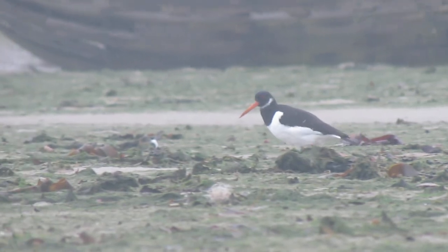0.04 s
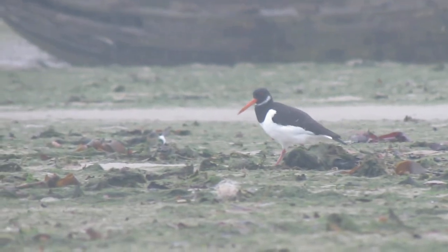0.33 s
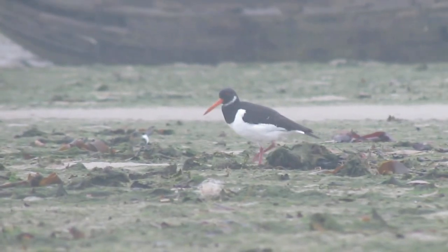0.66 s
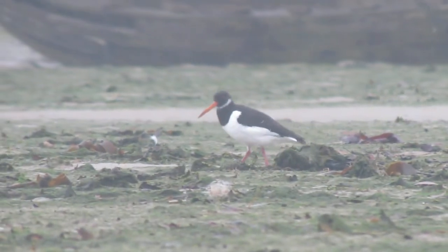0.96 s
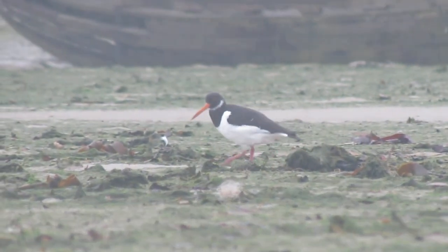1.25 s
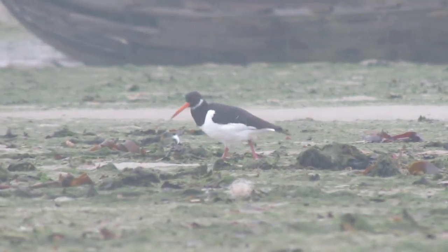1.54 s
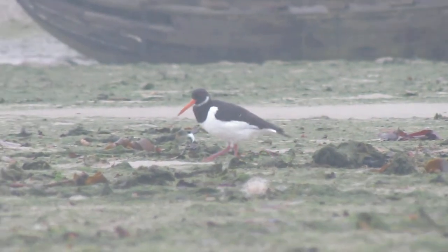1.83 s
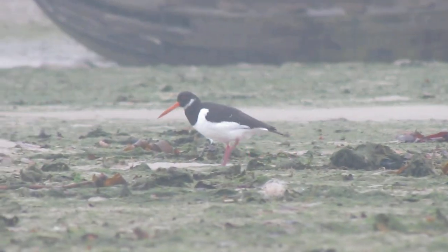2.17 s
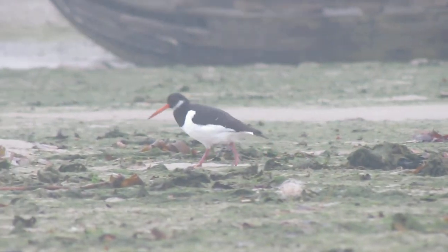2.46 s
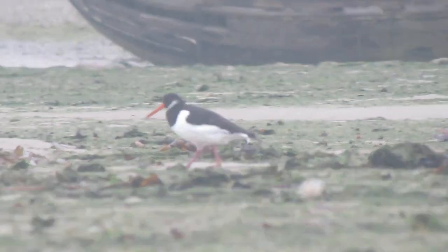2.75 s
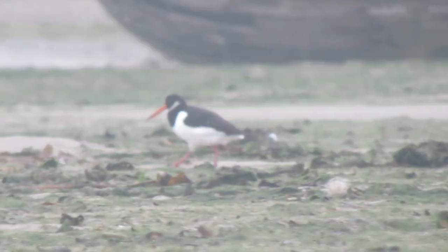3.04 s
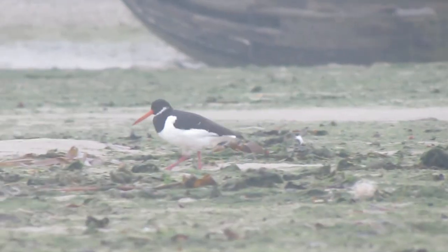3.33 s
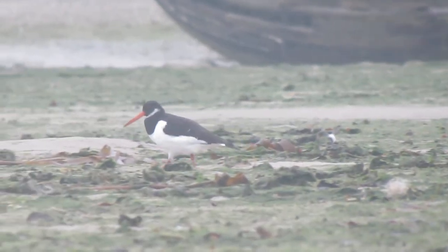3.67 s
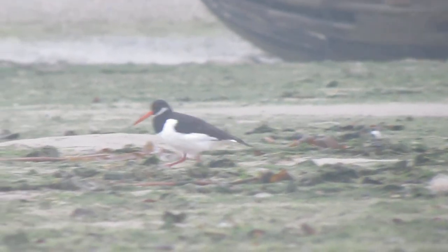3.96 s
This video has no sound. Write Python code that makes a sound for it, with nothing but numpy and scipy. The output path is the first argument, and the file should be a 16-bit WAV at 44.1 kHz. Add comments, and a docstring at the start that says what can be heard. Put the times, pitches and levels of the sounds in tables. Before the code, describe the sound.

Wading birds call over an open mudflat, with wind rumbling on the microphone, a steady distant wash and faint far piping. At 0.6 seconds one on the left gives a short cry, hoarse then clear and falling, echoing faintly. From 1 to 3.9 seconds another on the right sings seven whistles, climbing into wavering trills. A close click comes at 2.1 seconds, and soft bumps at 2.8 and 3.1.

```python
"""Wind rumbles on the microphone over a distant wash, and wading birds pipe far out on a tidal mudflat.
On the left one gives a cry, hoarse at first, then clear and falling, that returns from the far shore.
On the right another sings seven whistles that climb into wavering trills.
The calls scatter thinly off mud, hulls and shore; a few small clicks and bumps sound close by."""
import sys
import numpy as np
from scipy import signal
from scipy.fft import rfft, irfft
from scipy.io import wavfile
from scipy.ndimage import uniform_filter1d

SR = 44100
rng = np.random.default_rng(int(sys.argv[2]) if len(sys.argv) > 2 else 0)


def transcribe(signal):
    """Save signal, clipped to [-1, 1], as a 16-bit WAV file at the path in sys.argv[1]."""
    frames = np.atleast_2d(signal).T
    limited = np.clip(frames, -1, 1)
    pcm = np.round(limited * 32767).astype(np.int16)
    wavfile.write(sys.argv[1], SR, pcm)


N = 176400
CROAK_PAN_DB, CRY_LAG_MS, CRY_ECHO_DB = 7, 0.27, -19  # the crying bird, off to the left


def singer(song_db=-35.5, attack_s=0.011, release_s=0.0052, trill_fade_s=0.617):
    """The bird on the right: nearly pure whistles that scoop up, build into a trill and flick upward."""
    # start_s, end_s, held_hz, scoop_hz, scoop_s, first_crest_s, period_s, depth_hz, build_s, relative_db
    notes = [(1.03, 1.394, 1440, 310, .17, 1.25, .058, 6, .05, -5),
             (1.514, 1.763, 1548, 400, .022, 1.565, .057, 95, .05, -3.3),
             (1.869, 2.062, 1650, 430, .017, 1.912, .053, 110, .04, -2.2),
             (2.168, 2.352, 1715, 450, .017, 2.205, .053, 205, .055, -2),
             (2.471, 2.749, 1705, 420, .007, 2.504, .055, 270, .085, -.2),
             (2.881, 3.289, 1712, 380, .008, 2.925, .055, 280, .095, .2),
             (3.453, 3.927, 1675, 400, .005, 3.491, .0574, 310, .13, .5)]
    flick_s, flick_hz, flick_db = 0.0214, 455, -4
    t, voice = clock(), np.zeros(N)
    wobble = 1 + 0.0058 * walk(250)
    for start, end, held, scoop, scoop_s, crest, period, depth, build, db in notes:
        stop = end + flick_s + release_s
        on = (t > start) & (t < stop)
        now = t[on]
        pitch = held - scoop * np.exp((start - now) / scoop_s)
        trill = np.cos(np.pi * (now - crest) / period) ** 2
        trill *= ramp((now - crest + period / 2) / build) * (1 - ramp((now - end) / flick_s))
        swing = depth * trill * np.exp(-(now - crest) / trill_fade_s)
        flick = np.clip((now - end) / flick_s, 0, None)
        phase = turn((pitch + swing + flick_hz * flick) * wobble[on])
        onset = ramp((now - start) / (attack_s + scoop_s / 2))  # slow scoops start more softly
        envelope = onset * ramp((stop - now) / release_s)
        voice[on] += envelope * undb(song_db + db + flick_db * flick) * np.sin(phase)
    voice *= undb(1.2 * walk(110))  # the level shimmers
    off_hull = undb(-12) * late(voice, 0.027)  # a near reflection fills the gaps in the trill
    return place(voice + off_hull, pan_db=-17, lag_ms=-0.19) + undb(-12) * echo(voice)


def croak(edge_s=0.005, hoarseness=0.011, shift_at_s=0.605, shift_s=0.008):
    """The hoarse start of the cry on the left: a low register, the throat changing shape halfway."""
    # time_s, pitch_hz, level_db
    contour = [(.578, 456, -55), (0.591, 506, -40), (.603, 539, -30.5), (0.617, 577, -30), (.628, 562, -41)]
    # frequency_hz, early_gain_db, late_gain_db
    throat = [(550, -21, -22), (1063, 2, 2), (1650, -20, -16), (2280, -21, -6), (2850, -21, -9.5),
              (3600, -17.5, -23), (4280, -12.5, -25), (5600, -32, -36)]
    t, voice = clock(), np.zeros(N)
    times, pitch, level = np.array(contour).T
    hz = np.interp(t, times, pitch) * (1 + hoarseness * walk(700))
    phase = turn(hz)
    envelope = undb(np.interp(t, times, level))
    envelope *= ramp((t - times[0]) / edge_s) * ramp((times[-1] - t) / edge_s + 1)
    shift = ramp((t - shift_at_s) / shift_s)
    for k in range(1, 11):
        throat_db = (1 - shift) * over_hz(k * hz, throat) + shift * over_hz(k * hz, throat, column=2)
        voice += np.sqrt(2) * envelope * undb(throat_db) * np.sin(k * phase)
    return place(voice, CROAK_PAN_DB, CRY_LAG_MS) + undb(CRY_ECHO_DB) * echo(voice)


def cry(start_s=0.626, end_s=0.816, attack_s=0.0082, release_s=0.028):
    """The voice breaks upward into a clear, falling note; its harmonics flare as they cross resonances."""
    # frequency_hz, level_db
    resonances = [(1100, -41), (1400, -35.5), (2300, -42), (2620, -33.5), (2730, -43), (2830, -31),
                  (3500, -60), (3810, -42), (3950, -54.5), (4200, -37), (5000, -68), (5340, -48),
                  (5600, -63), (7100, -78)]
    # left_over_right_db, one per harmonic
    pans = (12.4, 2.8, 8, 11.4, 4)
    start_hz, sag_hz_per_s2 = 1426.3, 9300
    t, direct, voice = clock(), 0, 0
    hz = start_hz - sag_hz_per_s2 * (np.clip(t, start_s, end_s) - start_s) ** 2
    phase = turn(hz * (1 + 0.002 * walk(500)))
    shimmer = undb(walk(900))
    envelope = ramp((t - start_s) / attack_s) * ramp((end_s - t) / release_s) * shimmer
    for k, pan_db in enumerate(pans, 1):
        harmonic = np.sqrt(2) * envelope * undb(over_hz(k * hz, resonances)) * np.sin(k * phase)
        direct += place(harmonic, pan_db, CRY_LAG_MS)
        voice += harmonic
    far_shore = undb(-29) * place(late(voice, 0.176), CROAK_PAN_DB)
    return direct + undb(CRY_ECHO_DB) * echo(voice) + far_shore


def clicks():
    """Hard little contacts close to the microphone, ringing briefly."""
    # start_s, body_db, edge_db
    hits = [(.961, -56, -40), (2.0797, -21.5, -36.5), (2.0809, -24, -42.5), (2.0831, -25, -53)]
    # frequency_hz, relative_db, t60_s
    modes = [(1340, -1.5, 0.014), (1670, -11.5, .022), (2360, -0.5, 0.0072), (2760, -11.5, 0.027),
             (3450, -16.5, 0.016)]
    return knocks(hits, modes, push_s=0.00051, edge_s=0.0013, edge_hz=(4000, 13000),
                  pan_db=-2, lag_ms=-0.11)


def bumps():
    """Softer, duller contacts close by, a little to the right."""
    # start_s, body_db, edge_db
    hits = [(2.7522, -24.5, -41), (3.0682, -23.5, -37.5), (3.0797, -32, -40)]
    # frequency_hz, relative_db, t60_s
    modes = [(169, -7, 0.048), (574, -4.5, .032), (870, -1, .0076), (1173, 4, 0.029), (4950, -21, .014)]
    return knocks(hits, modes, push_s=0.0018, edge_s=0.0043, edge_hz=(2200, 6000),
                  pan_db=-5.5, lag_ms=-0.3)


def knocks(hits, modes, push_s, edge_s, edge_hz, pan_db, lag_ms):
    """Each contact gives a crisp edge of noise and rings a few quickly damped modes."""
    t, body, edge = clock(), np.zeros(N), np.zeros(N)
    for start, body_db, edge_db in hits:
        at = np.flatnonzero(t > start)[:SR // 8]
        age = t[at] - start
        for k, (hz, db, t60) in enumerate(modes):
            envelope = ramp(age / push_s) * undb(body_db + db - 60 * age / t60)
            body[at] += (-1) ** k * envelope * np.sin(2 * np.pi * hz * age)
        edge[at] += undb(edge_db) * np.exp(-age / edge_s)
    band = signal.butter(2, edge_hz, "band", fs=SR, output="sos")
    return place(body, pan_db, lag_ms) + signal.sosfilt(band, edge * rng.standard_normal((2, N)))


def far_birds():
    """Thin, ragged pipes and twitters left of centre, blurred by distance."""
    # start_s, length_s, start_hz, end_hz, level_db
    pipes = [(0.098, 0.037, 2800, 2430, -51.5), (0.355, .057, 2815, 2230, -56),
             (0.391, .55, 2238, 2263, -57), (.69, .22, 3190, 3140, -62), (.927, 0.038, 2480, 2610, -50),
             (.959, .055, 2850, 2015, -57), (1.346, .1, 5130, 5030, -67), (1.631, 0.082, 2770, 2110, -53),
             (2.511, 0.036, 3800, 3640, -57), (2.568, .085, 3660, 4700, -57),
             (2.65, 0.098, 4690, 4670, -65), (3.107, .034, 2340, 2146, -51),
             (3.325, 0.03, 2320, 2170, -43.5), (3.72, .2, 4840, 4400, -70)]
    t, voices = clock(), np.zeros(N)
    waver, flicker = 0.022 * walk(450), undb(2 * walk(120))
    for start, length, start_hz, end_hz, db in pipes:
        on = (t > start) & (t < start + length)
        progress = (t[on] - start) / length
        arch = np.sin(np.pi * progress)
        glide = start_hz + (end_hz - start_hz) * progress
        ragged = waver[on] / (1 + (length / 0.21) ** 4)  # long whistles hold steadier
        phase = turn(glide * (1 + 0.012 * arch + ragged))
        voices[on] += undb(db) * flicker[on] * np.sqrt(2 * arch) * np.sin(phase)
    direct = place(voices, pan_db=5)
    return direct + undb(-4) * echo(direct.mean(axis=0))


def wind(lift_db=8.5, flutter_db=0.45):
    """Gusts rumble on the microphone."""
    # frequency_hz, relative_db
    spectrum = [(20, -9), (45, -2.5), (70, 0.5), (110, -6.5), (300, -34), (800, -59.5)]
    # time_s, relative_db
    gusts = [(.1, -42), (.8, -40.5), (1.0, -48.5), (1.58, -41.5), (2.15, -47), (2.9, -48.5), (3.25, -43.5),
             (3.5, -52.5), (3.8, -45)]
    hz = frequencies()
    level_db = np.interp(clock(), *np.array(gusts).T) + lift_db + flutter_db * walk(12)
    shape = undb(over_hz(hz, spectrum)) * ramp(hz / 20)
    return air(shape, pan_db=-4.5, likeness=-0.65) * undb(level_db)


def distant_wash(level_db=-42.5, rise_db_per_s=0.31, low_cut_hz=124.4):
    """A broad wash of noise far off, mostly to the right, growing very slightly."""
    # frequency_hz, relative_db
    spectrum = [(88, -12), (150, 2), (366, -9.5), (481, -6), (550, -9.5), (985, -10), (1170, -16),
                (2500, -26), (3040, -30), (15500, -48)]
    # frequency_hz, left_over_right_db, likeness, left_lead_rad
    stereo = [(272, 2, 0.87, -0.83), (472, -3.5, 0.69, -1.25), (850, -7.5, 0.69, -1.85),
              (1300, -5.5, 0.22, -2.5), (5000, 0.5, .15, 0)]
    hz = frequencies()
    shape = undb(over_hz(hz, spectrum)) * hz ** 2 / (hz ** 2 + low_cut_hz ** 2)
    pan_db, likeness, lead_rad = (over_hz(hz, stereo, column) for column in (1, 2, 3))
    return air(shape, pan_db, likeness, lead_rad) * undb(level_db + rise_db_per_s * (clock() - 2.5))


def echo(x, t60_s=0.38, delay_s=0.0073):
    """Scatter from mud, hulls and shore: a thin, diffuse tail."""
    t = clock()[:SR]
    tail = rng.standard_normal((2, SR)) * undb(-60 * t / t60_s) * (t > delay_s)
    tail /= np.sqrt(np.sum(tail ** 2) / 2)
    return signal.fftconvolve(x[None], tail, axes=1)[:, :N]


def air(shape, pan_db, likeness, lead_rad=0):
    """Stereo noise with a given spectrum, balance, correlation and phase lead of the left side."""
    mid, side = rfft(rng.standard_normal((2, N)))
    sign = np.array([[1], [-1]])
    pair = mid * np.sqrt(1 + likeness) + sign * side * np.sqrt(1 - likeness)
    balance = undb(sign * pan_db / 2) * np.exp(1j * sign * lead_rad / 2)
    return unit(irfft(shape * pair * balance, N))


def place(x, pan_db, lag_ms=0):
    """The nearer side is louder and earlier; positive values lie to the left."""
    right = irfft(rfft(x) * np.exp(-2j * np.pi * frequencies() * lag_ms / 1000), N)
    gains = undb(np.array([[pan_db], [-pan_db]]) / 2)
    return np.array([x, right]) * gains / np.sqrt(np.mean(gains ** 2))


def late(x, delay_s):
    """The same sound, arriving later."""
    return np.interp(clock() - delay_s, clock(), x, left=0)


def walk(rate_hz):
    """Smooth random drift, rms 1."""
    hold = int(SR / rate_hz)
    steps = np.repeat(rng.standard_normal(N // hold + 1), hold)
    return unit(uniform_filter1d(uniform_filter1d(steps, hold), hold)[:N])


def over_hz(hz, table, column=1):
    """Read a column of a table on a log-frequency axis."""
    table = np.array(table, float)
    return np.interp(np.log(hz + 1), np.log(table[:, 0] + 1), table[:, column])


def turn(hz):
    """Phase of a voice with this pitch."""
    return 2 * np.pi * np.cumsum(hz) / SR


def ramp(u):
    """Smooth step from 0 to 1."""
    return np.sin(np.clip(u, 0, 1) * np.pi / 2) ** 2


def undb(db):
    """Decibels to gain."""
    return 10 ** (np.asarray(db) / 20)


def unit(x):
    """Scale to rms 1."""
    return x / np.sqrt(np.mean(x ** 2))


def clock():
    """Time of each sample in seconds."""
    return np.arange(N) / SR


def frequencies():
    """Frequency of each spectrum bin in hertz."""
    return np.arange(N // 2 + 1) * SR / N


def scene():
    """Close knocks, birds and the open shore, heard from one spot on the mudflat."""
    return clicks() + bumps() + singer() + croak() + cry() + far_birds() + distant_wash() + wind()


def record(dry, top_hz=15700):
    """The recorder cuts the top of the treble steeply."""
    return signal.sosfilt(signal.ellip(10, 0.1, 70, top_hz, fs=SR, output="sos"), dry)


dry = scene()
out = record(dry)
transcribe(out)
```